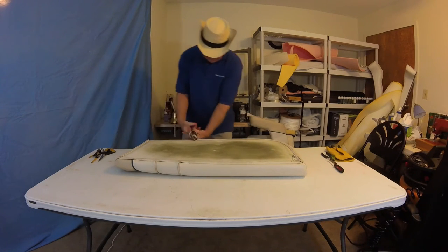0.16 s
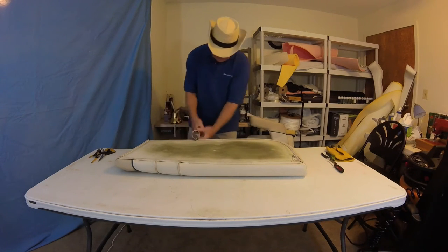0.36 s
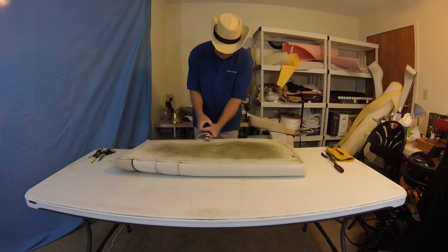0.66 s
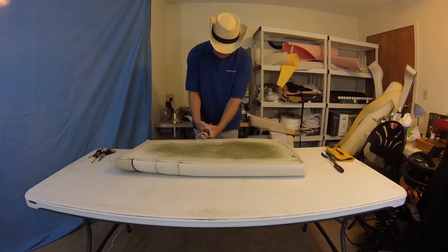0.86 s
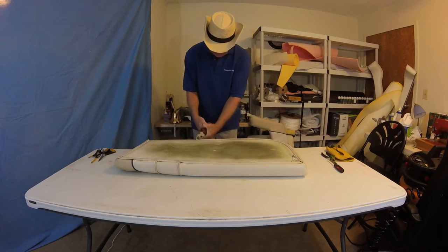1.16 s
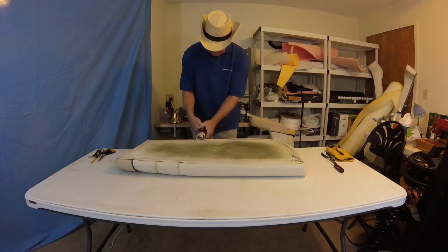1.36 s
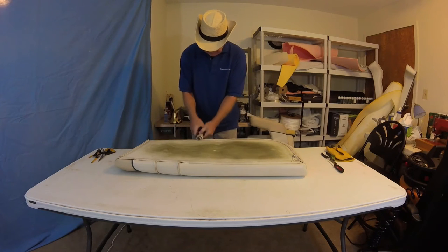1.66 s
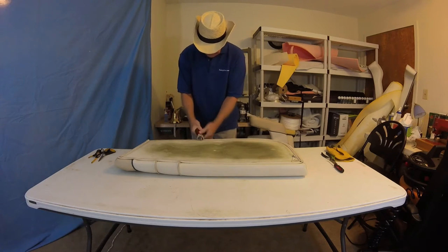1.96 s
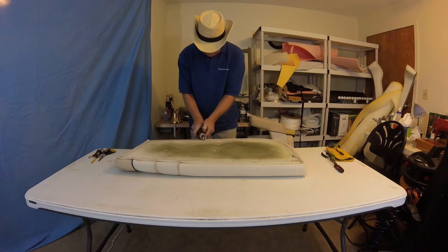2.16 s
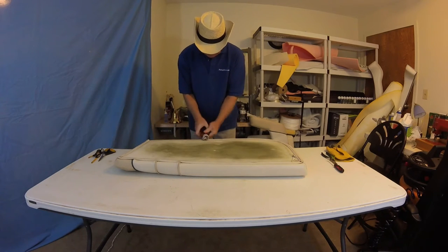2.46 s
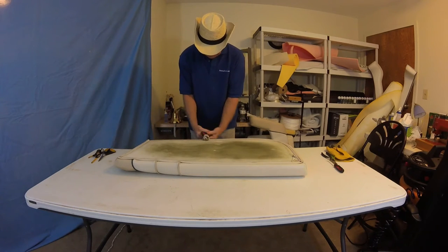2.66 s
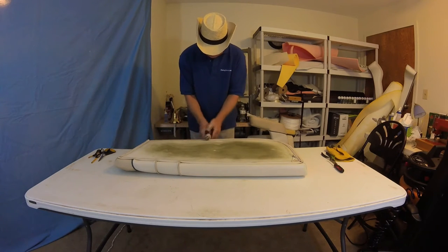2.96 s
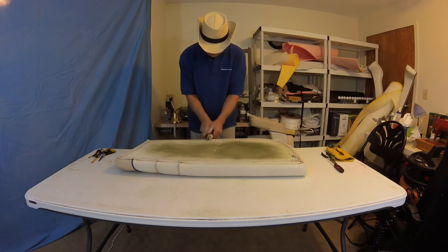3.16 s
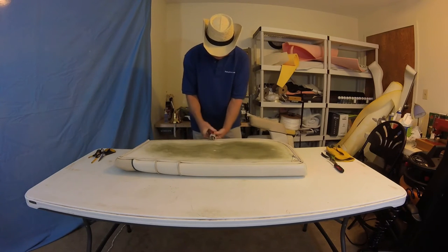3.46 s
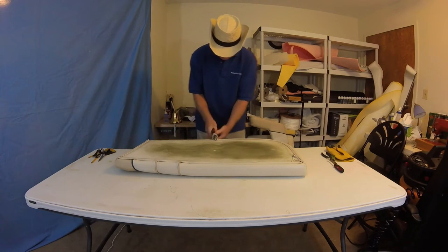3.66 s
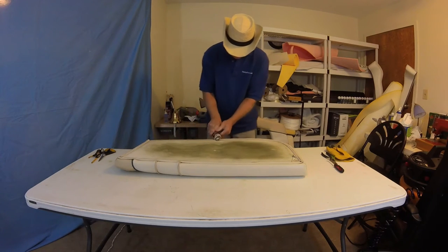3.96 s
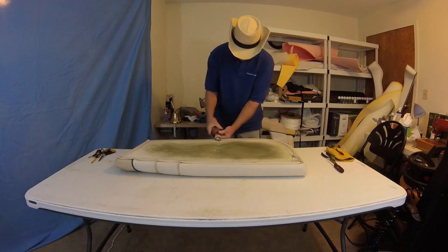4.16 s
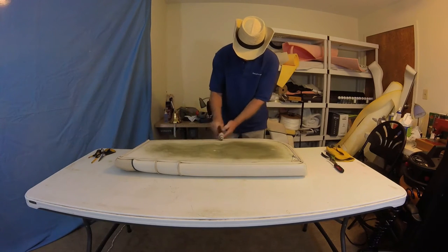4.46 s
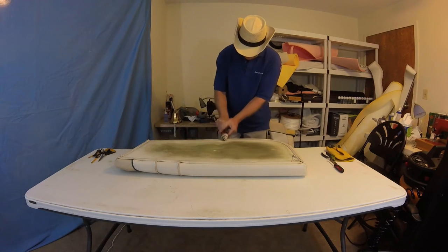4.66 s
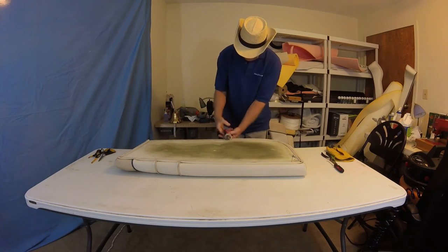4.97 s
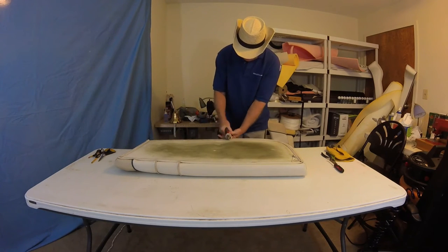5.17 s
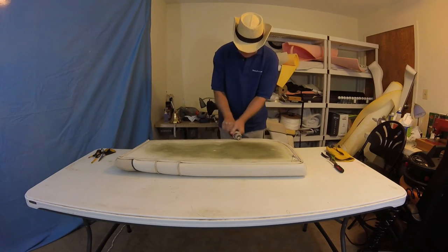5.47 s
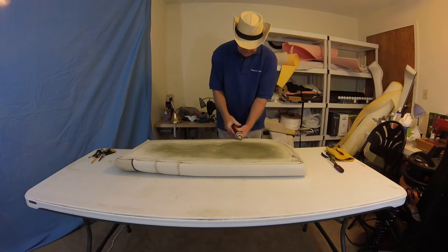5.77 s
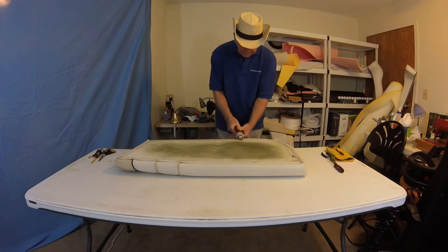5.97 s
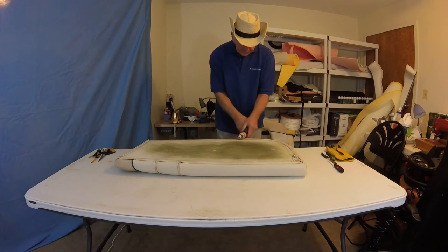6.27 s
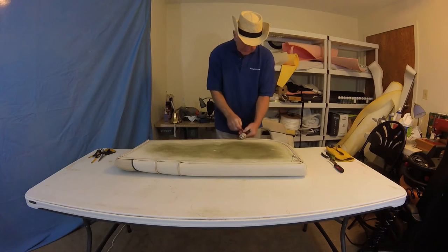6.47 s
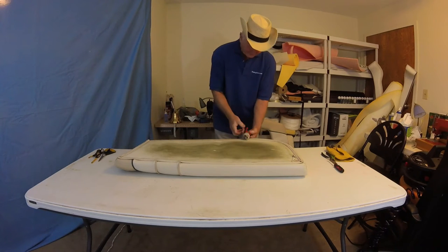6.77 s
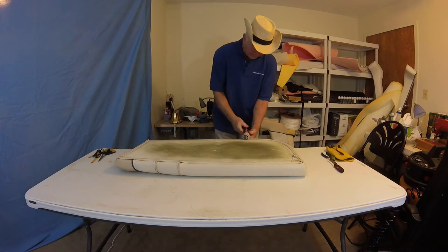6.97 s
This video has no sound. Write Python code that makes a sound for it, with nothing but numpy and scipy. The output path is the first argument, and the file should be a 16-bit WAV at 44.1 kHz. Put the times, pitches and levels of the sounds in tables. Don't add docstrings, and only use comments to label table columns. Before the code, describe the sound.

Low uneven rumble and faint hiss sit under sparse light touches, then a sharp snap and a deep board thump. Rapid ratchety bursts of steel clicking and wood knocking follow, separated by small scrapes and padding rustle. The bursts thin out before one last heavy pair of knocks. The sound is close to mono, from a camera at modest distance in a lively small room.

```python
import sys
import numpy as np
from scipy import signal
from scipy.fft import rfft, irfft, next_fast_len
from scipy.io import wavfile
from scipy.ndimage import uniform_filter1d, map_coordinates

SR = 44100
rng = np.random.default_rng(int(sys.argv[2]) if len(sys.argv) > 2 else 0)


def materialize(psi):
    bounded = np.clip(np.atleast_2d(psi).T, -1, 1)
    quanta = np.round(bounded * 32767).astype(np.int16)
    wavfile.write(sys.argv[1], SR, quanta)


def rack_gain(trim_db):
    fader = np.asarray(trim_db, float)
    return 10 ** (fader / 20)


N = 313992

# (frequency [Hz], level [dB per Hz])
NOISE_COLOUR = [(12, -46), (20, -1), (88, -10.5), (329, -23), (800, -32), (12500, -56.5), (16200, -71),
                (22000, -120)]
# (time [s], level [dB])
RUMBLE_LEVEL = [(0, -46), (.3, -51.5), (.81, -48.5), (2.34, -50.5), (3.37, -51), (3.69, -45), (4.4, -52),
                (4.66, -48), (5.33, -51.5), (5.6, -50), (6.8, -50), (7.12, -52)]
# (time [s], rustle level [dB])
HAND_PRESSES = [(0, -67), (1.23, -69), (1.47, -80.5), (2.14, -55.5), (2.38, -75.5), (3.77, -58.5),
                (3.94, -54.5), (4.32, -55), (4.6, -54.5), (4.72, -54.5), (5.99, -72), (6.15, -61.5),
                (6.52, -53.5), (6.72, -66), (7.12, -92)]
# (frequency [Hz], level [dB per Hz])
PADDING_COLOUR = [(150, -34), (350, -12), (600, -5.5), (950, 8.5), (1300, -3.5), (2500, -36), (6000, -45)]
# (time [s], peak [dB], pitch [Hz], table-top knock [dB])
BOARD_THUMPS = [(.003, -36, 131.5, -60), (.19, -46, 278, -63), (0.673, -30.5, 158, -47.5),
                (0.678, -31, 75.4, -65), (2.105, -23, 144.3, -34), (2.724, -42, 82, -42),
                (2.947, -31.5, 297, -36.5), (2.96, -29, 203, -30), (2.985, -27.5, 156, -37),
                (3.249, -31.5, 150, -41), (3.482, -26, 151, -31.5), (3.788, -43, 298, -51),
                (3.811, -29, 250, -36), (3.851, -34, 150.5, -38), (4.233, -37.5, 296, -34),
                (4.445, -27.5, 266, -35.5), (4.47, -34, 95.6, -31), (4.507, -28, 277, -31.5),
                (4.54, -32, 164, -37), (4.91, -31.5, 88, -46.5), (4.939, -43, 83.6, -54),
                (5.033, -41, 86, -62), (5.362, -29, 108.6, -33.5), (5.386, -26, 107.7, -35),
                (5.573, -36.5, 85.5, -58), (5.842, -38, 99.5, -53), (6.368, -39.5, 95, -47.5),
                (6.535, -29.5, 97, -37), (6.63, -21.5, 93.5, -30.5), (7.056, -40.5, 275, -52)]
# (frequency [Hz], level [dB], time to fall 60 dB [s])
TABLE_TOP_MODES = [(202, 5.5, 0.064), (242, -3.5, 0.12), (283.3, 1, 0.093), (335.5, -2.5, 0.082),
                   (476, -8.5, 0.055)]
# (frequency [Hz], level [dB], time to fall 60 dB [s])
TABLE_LEG_MODES = [(70.4, -27, 0.031), (88, 6, 0.12), (121.5, 7, 0.2)]
# (time [s], metal [dB], wood [dB], wood colour [Hz])
STAPLE_JERKS = [(1.7091, -43.5, -35, 750), (2.0721, -45, -32.5, 900), (2.1006, -33.5, -26, 990),
                (2.9436, -30.5, -24.5, 910), (2.9633, -25, -27.5, 870), (2.9761, -43, -26, 850),
                (3.0026, -50, -39.5, 814), (3.2463, -35.5, -32.5, 820), (3.4826, -31, -25.5, 940),
                (3.4973, -48, -46, 860), (3.7901, -41.5, -43, 620), (3.804, -30, -33, 710),
                (3.8183, -31.5, -32.5, 796), (3.8312, -33.5, -31.5, 900), (3.8495, -48, -36, 634),
                (4.2354, -30.5, -28.5, 870), (4.4473, -33, -27.5, 860), (4.4649, -31.5, -28.5, 940),
                (4.4769, -34, -31.5, 880), (4.4973, -36, -38, 560), (4.508, -36, -32, 1010),
                (4.5162, -30, -25.5, 940), (4.5289, -49, -30, 860), (4.557, -38, -33, 920),
                (4.9432, -42.5, -35, 960), (5.3662, -31.5, -30.5, 720), (5.3885, -44, -28, 870),
                (6.508, -41, -31, 850), (6.5322, -35.5, -26.5, 990), (6.6313, -54.5, -29.5, 780)]
# (time [s], metal [dB], wood [dB])
LIGHT_TOUCHES = [(.2794, -72, -43.5), (.46, -62, -46.5), (0.6749, -60, -41), (.9817, -48, -58),
                 (1.0293, -61, -46), (1.7462, -54.5, -35), (2.7317, -61, -39), (3.2667, -60, -34),
                 (3.4309, -47, -46), (3.7374, -48.5, -42.5), (4.229, -41, -49), (4.6619, -54, -42.5),
                 (4.6971, -51.5, -52), (4.8275, -52.5, -51), (4.8573, -54.5, -52), (5.0394, -60, -58),
                 (5.09, -54.5, -55), (5.2294, -48.5, -43), (5.2585, -52, -44), (5.3053, -45.5, -39),
                 (5.6316, -55, -42.5), (5.7638, -47, -46), (5.8362, -49.5, -42.5), (5.895, -55, -42),
                 (6.2138, -54, -50), (6.2816, -49.5, -45), (6.3736, -46.5, -40.5), (6.395, -56, -44),
                 (6.8117, -51, -48), (7.055, -41.5, -42)]
# (time [s], claw colour [Hz], claw focus [dB per octave squared],
# claw over steel [dB], steel colour [Hz])
TOOL_GRIPS = [(.98, 3650, 30, -3.5, 7400), (1.708, 4200, 7, -2, 6000), (2.071, 3240, 86, 4, 6700),
              (2.942, 2730, 10, -5.5, 7300), (3.246, 3220, 15, -1.5, 5740), (3.43, 2860, 5, -0.5, 7900),
              (3.73, 3320, 19, -2, 8300), (4.229, 3400, 27, -3, 7400), (4.446, 3140, 13, -4, 7300),
              (4.495, 3400, 21, -3, 7000), (4.826, 3520, 36, 3.5, 6500), (5.229, 3230, 25, 0, 7300),
              (5.362, 3430, 11, 1, 7600), (5.6, 3400, 25, -8, 7200), (6.21, 3330, 28, 0, 6500),
              (6.508, 3400, 40, -3, 7650), (6.53, 3480, 88, 6, 7500), (6.8, 3300, 20, -5, 7600)]
# (frequency [Hz], width [Hz], level [dB])
STEEL_MODES = [(4990, 350, 1.5), (6070, 630, -2), (7000, 660, -2.5), (7900, 334, -1.5), (8330, 540, -3),
               (10920, 2700, -4.5), (13800, 2600, -4.5)]
# (frequency [Hz], width [Hz], level [dB])
CLAW_MODES = [(1740, 1160, -5), (2540, 153, 2), (2744, 197, 0), (3330, 346, 1.5), (3670, 310, -1),
              (4200, 480, -2), (4700, 300, -6.5)]
# (frequency [Hz], width [Hz], level [dB])
WOOD_MODES = [(369, 360, 1), (620, 210, 2.5), (850, 240, 2), (1012, 257, 1.5), (1480, 170, 2),
              (1750, 300, -15.5), (1950, 220, -26)]
PATH_DELAYS = [0, .0048, .0136, .0252, .0298]
# (steel [dB], claw [dB], wood [dB])
PATH_LEVELS = [
    (-1, 8.9, 8.5),
    (0, 8.1, 1.7),
    (-10, 9.7, -9),
    (3, 1.8, -9),
    (-14, 0.65, -5),
]
# (level [dB], time to fall 60 dB at the lowest mode [s], build-up [s])
ROOM_TAILS = [
    (-24, 0.4, 0.0069),
    (-16, 0.42, 0.0064),
    (-19.5, 0.42, 0.008),
]
# (frequency [Hz], level [dB])
FAINTEST_KEPT = [(6000, -120), (9000, -107), (11000, -103.5), (13000, -104), (13700, -101), (15000, -97),
                 (15500, -92), (16000, -70)]


def unit(x):
    return x / np.sqrt(np.mean(x ** 2) + 1e-20)


def along(points, hz):
    f, v = np.transpose(points)
    return np.interp(np.log(hz + 1), np.log(f + 1), v)


def filtered(x, response):
    m = next_fast_len(N + SR // 2)
    return irfft(rfft(x, m) * response(np.fft.rfftfreq(m, 1 / SR)), m)[..., :N]


def wobble(rate):
    knots = rng.standard_normal(int(N * rate / SR) + 4)
    return map_coordinates(knots, [np.arange(N) * rate / SR])


def air():
    split_hz, hiss_db = 231, -65.5
    t = np.arange(N) / SR

    def low(hz):
        return 1 / (1 + (hz / split_hz) ** 2)

    rumble = filtered(rng.standard_normal(N), lambda hz: rack_gain(along(NOISE_COLOUR, hz)) * low(hz) * (hz > 8))
    hiss = filtered(rng.standard_normal(N), lambda hz: rack_gain(along(NOISE_COLOUR, hz)) * (1 - low(hz)))
    rumble_db = np.interp(t, *np.transpose(RUMBLE_LEVEL)) + 2.0 + 2.26 * wobble(3.575)
    lift_db = 0.094 * (np.interp(t, *np.transpose(HAND_PRESSES)) + 61.5)
    hiss_db = hiss_db + 10.0 + lift_db + 0.11 * wobble(6)
    return unit(rumble) * rack_gain(rumble_db) + unit(hiss) * rack_gain(hiss_db)


def hands():
    s, db = np.transpose(HAND_PRESSES)
    grains = rng.standard_normal(N) * rack_gain(7.0 * wobble(35) + 1.4 * wobble(300))
    rustle = unit(filtered(grains, lambda hz: rack_gain(along(PADDING_COLOUR, hz))))
    return rustle * rack_gain(np.interp(np.arange(N) / SR, s, db) - 5.0)


def rings(modes, t, rise_turns, scatter_db):
    hz, db, t60 = np.transpose(modes)[..., None]
    strength_db = db + scatter_db * rng.standard_normal(hz.shape)
    rise = 1 - np.exp(-t * hz / rise_turns)
    swell = rack_gain(strength_db - 60 * t / abs(t60)) * rise
    return -np.sum(swell * np.sin(2 * np.pi * hz * t), axis=0)


def board():
    out = np.zeros(N + SR)
    t = np.arange(SR // 2) / SR
    for s, db, hz, top_db in BOARD_THUMPS:
        t60 = 0.2 * (hz / 107) ** -0.36
        flex = rings([(hz, db - 2.5, t60)], t, rise_turns=0.64, scatter_db=0)
        top = rack_gain(top_db + 3.0) * rings(TABLE_TOP_MODES, t, rise_turns=1.0, scatter_db=2.0)
        legs = rack_gain(db - 19.5) * rings(TABLE_LEG_MODES, t, rise_turns=0.5, scatter_db=4.5)
        out[round(s * SR):][:len(t)] += flex + top + legs
    return out[:N]


def contacts():
    jerks, touches = np.array(STAPLE_JERKS), np.array(LIGHT_TOUCHES)
    colour_hz = 860 * 2 ** (0.087 * rng.standard_normal((len(touches), 1)))
    # delay [s], loss in metal [dB], loss in wood [dB], change of colour [Hz]
    catch = [.011, -20, -6.5, 0]
    chance = rng.standard_normal(jerks.shape) * [0.00202, 2.5, 2.5, 40]
    return np.vstack([jerks, np.hstack([touches, colour_hz]), jerks + catch + chance])


def struck(body, part, events, level_db, colour_hz, focus, contact_s, rough, boost_db, scatter_db, soft_hz):
    paths = np.array(PATH_LEVELS)[:, part, None]
    hz, width, db = np.transpose(body)[..., None]
    scatter = scatter_db * rng.standard_normal((len(events), len(body))).T
    share = rack_gain(scatter - focus * np.log2(hz / colour_hz) ** 2)
    total = np.linalg.norm(share * rack_gain(db) * np.sqrt(width), axis=0)
    size = rack_gain(level_db + boost_db) * share / total

    t = np.arange(SR // 500) / SR
    chance = rng.standard_normal((len(events), len(paths), len(t) + 1))
    push = (1 + rough * chance[..., 1:]) * rack_gain(-60 * t / contact_s)
    push *= rack_gain(paths + 0.36 * chance[..., :1]) / np.linalg.norm(push, axis=2, keepdims=True)
    start = np.round((events[:, None] + PATH_DELAYS) * SR).astype(int)
    at = start[..., None] + np.arange(len(t))
    jolts = [np.bincount(at.ravel(), (push * mode[:, None, None]).ravel(), N + SR)[:N] for mode in size]

    tail_db, t60, rise = ROOM_TAILS[part]
    u = np.arange(SR // 2) / SR
    t60 = t60 * (hz / hz[0]) ** -.5
    decay = rack_gain(2 * (tail_db - 60 * u / t60)) * (1 - np.exp(-u / abs(rise)))
    spread = 1.3 * size ** 2 + 0.2 * np.mean(size ** 2, axis=0)
    energy = [np.bincount(start[:, 0], mode, N) for mode in spread]
    envelope = np.sqrt(abs(signal.fftconvolve(energy, decay, axes=1)[:, :N]))
    tail = envelope * rng.standard_normal(N) * rack_gain(1.9 * wobble(220))

    sign = (-1) ** np.arange(len(body))[:, None]

    def response(f):
        ring = sign * rack_gain(db) * 1j * f * width / (hz * hz - f * f + 1j * f * width)
        soft = 1 / (1 + 1j * f / soft_hz) ** 2
        return ring * soft

    return filtered(jolts + tail, response).sum(axis=0)


def staples():
    s, metal_db, wood_db, wood_hz = contacts().T
    grips = np.array(TOOL_GRIPS)
    current = np.searchsorted(grips[:, 0], s + .004) - 1
    grip = grips[np.clip(current, 0, None)]
    _, claw_hz, claw_focus, claw_db, steel_hz = grip.T
    steel_hz = steel_hz * 2 ** (0.049 * rng.standard_normal(len(s)))
    steel = struck(STEEL_MODES, 0, s, metal_db, steel_hz, focus=15.7, contact_s=0.0002,
                   rough=2.2, boost_db=52.0, scatter_db=2.4, soft_hz=18800)
    claw = struck(CLAW_MODES, 1, s, metal_db + claw_db, claw_hz, focus=claw_focus, contact_s=0.00053,
                  rough=1.57, boost_db=49.0, scatter_db=1.9, soft_hz=6500)
    wood = struck(WOOD_MODES, 2, s, wood_db, wood_hz, focus=23.7, contact_s=0.0004,
                  rough=0.61, boost_db=50.5, scatter_db=2.3, soft_hz=1520)
    return steel + claw + wood


def scene():
    return np.tile(air() + hands() + board() + staples(), (2, 1))


def top_cut(x):
    return signal.sosfilt(signal.butter(12, 15780, fs=SR, output="sos"), x)


def record(dry):
    hz, _, z = signal.stft(dry, SR, nperseg=2048)
    patches = uniform_filter1d(rng.standard_normal(z.shape[1:]), size=10, axis=0)
    patches = unit(uniform_filter1d(patches, size=3, axis=1))
    loudness = np.linalg.norm(z[0, 20:], axis=0)
    limit = rack_gain(along(FAINTEST_KEPT, hz)[:, None] + 5 * patches) * (loudness / np.median(loudness)) ** .2
    kept = signal.istft(z * (abs(z) > limit), SR, nperseg=2048)[1][:, :N]
    drift = rack_gain(-29.5) * wobble(250) + rack_gain(-41.5) * rng.standard_normal(N)
    side = filtered(kept[0] * drift, lambda hz: hz / (hz + 50) * (1.02 + hz / 12000) * (hz < 13500))
    side *= rack_gain(14.2 * wobble(25) - 13)
    return top_cut(kept + side * np.array([[1], [-1]]))


dry = scene()
out = record(dry)
materialize(out)
```